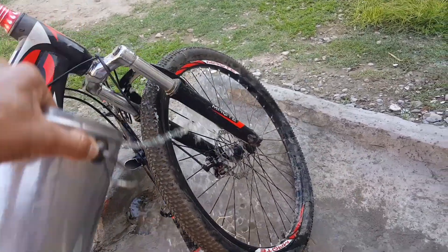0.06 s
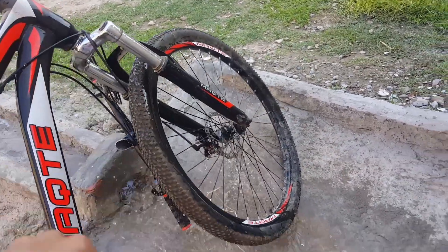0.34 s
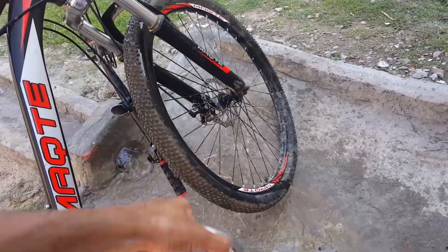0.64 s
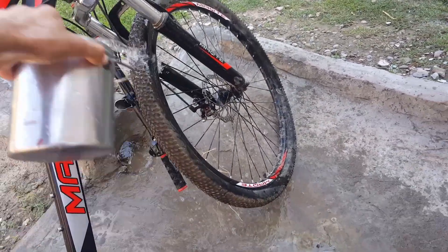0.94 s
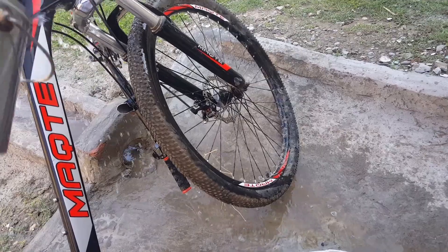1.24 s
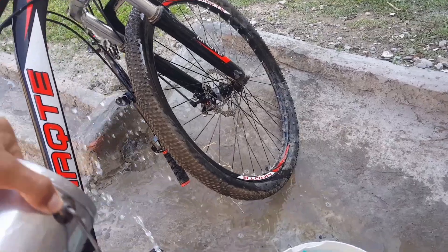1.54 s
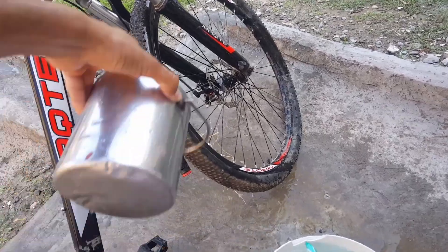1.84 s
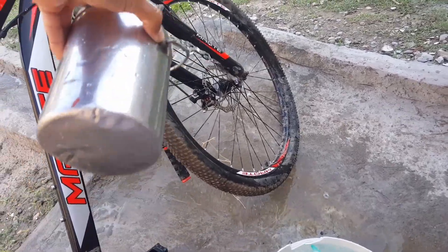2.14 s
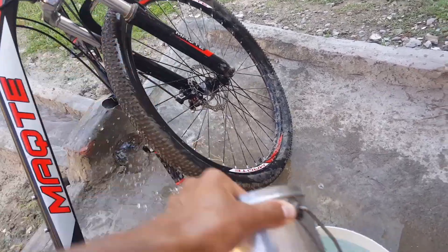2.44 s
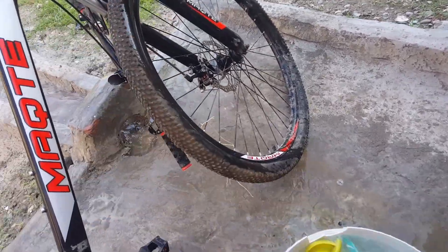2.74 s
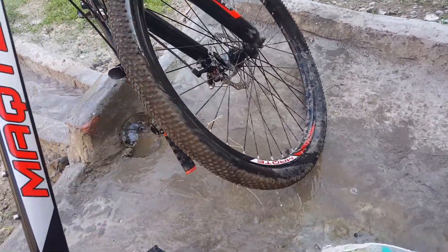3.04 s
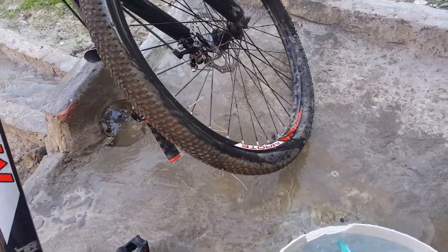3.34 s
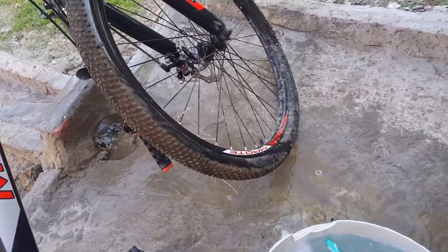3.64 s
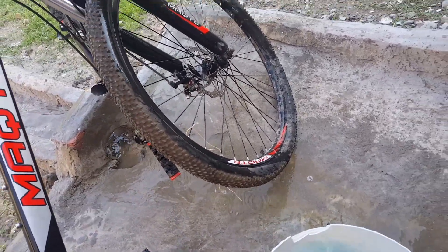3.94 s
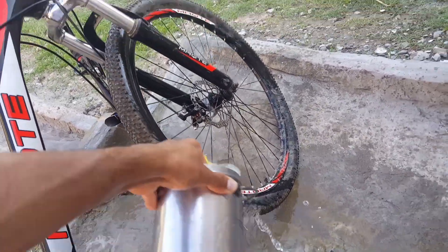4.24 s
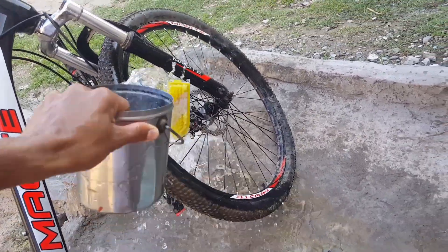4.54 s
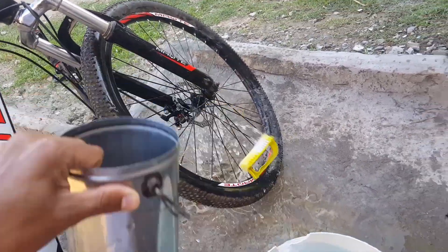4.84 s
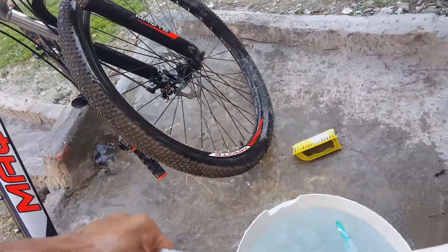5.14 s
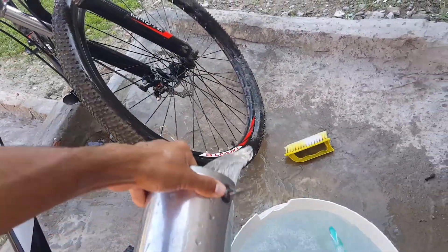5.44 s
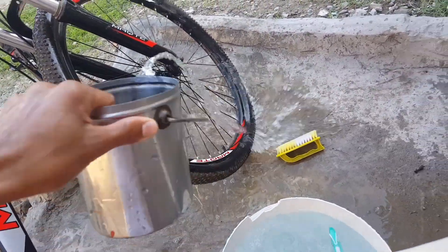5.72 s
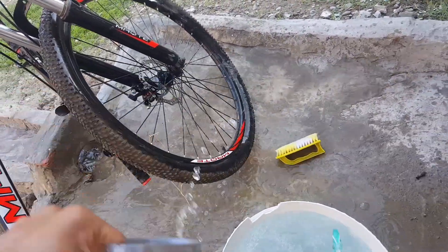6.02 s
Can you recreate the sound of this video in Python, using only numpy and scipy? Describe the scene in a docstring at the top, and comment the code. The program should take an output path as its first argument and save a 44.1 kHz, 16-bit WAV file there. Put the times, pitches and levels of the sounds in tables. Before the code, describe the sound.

Water splashes over a bicycle and drips onto wet concrete, while a steel can clanks and gurgles full in a plastic bucket.

```python
"""Water splashes over a bicycle in a yard, spatters on the frame and drips into puddles on the concrete.
It is soapy water, scooped from a plastic bucket with a steel can and thrown. The can clanks, knocks
the bucket and gurgles full, and a scrubbing brush tumbles out with the water. A motor hums far away.
The water sounds through ringing air bubbles and the ticks of bursting drops; can, bucket and brush
ring with their own fading tones when they are struck."""
import sys
import numpy as np
from scipy import signal
from scipy.fft import rfft, irfft, next_fast_len
from scipy.io import wavfile
from scipy.ndimage import map_coordinates

SR = 44100
rng = np.random.default_rng(int(sys.argv[2]) if len(sys.argv) > 2 else 0)


def persist_wave(psi):
    """Save psi, clipped to +-1, as 16-bit WAV."""
    counts = np.round(np.clip(psi, -1, 1) * 32767).astype(np.int16)
    wavfile.write(sys.argv[1], SR, np.atleast_2d(counts).T)


N = 276948


def amp(db):
    """Turn decibels into a gain."""
    return 10 ** (np.asarray(db) / 20)


def unit(x):
    """Scale a sound to an average (rms) level of 1."""
    return x / np.sqrt(np.mean(x ** 2) + 1e-20)


def along(points, hz):
    """Read between (pitch, value) points, with every octave equally wide."""
    pitches, values = np.transpose(points)
    return np.interp(np.log(hz + 1), np.log(pitches), values)


def wobble(rate, size=N):
    """A smooth curve through rate random values a second."""
    points = rng.standard_normal(int(size * rate / SR) + 4)
    return map_coordinates(points, [np.arange(size) * rate / SR])


def noise(colour, size, width):
    """Stereo noise: colour sets the level at each pitch, width how much left and right differ."""
    m = next_fast_len(size)
    gain = amp(along(colour, np.fft.rfftfreq(m, 1 / SR)))
    pair = irfft(rfft(rng.standard_normal((2, m))) * gain, m)[:, :size]
    mid = pair.mean(axis=0)
    return unit(mid + width * (pair - mid))


def add(track, s, sound):
    """Mix a short sound into the track at s seconds."""
    start = max(round(s * SR), 0)
    part = track[:, start:start + sound.shape[-1]]
    part += sound[..., :part.shape[-1]]


# two shared noise colours, bright spray and a dull thud: (pitch [Hz], level [dB])
SPRAY_COLOUR = [(60, -50), (300, -72), (1500, 0), (3000, 6), (5500, 5), (7500, -3.5), (9700, -13.5),
                (12500, -2.5), (16000, -10.5)]
THUD_COLOUR = [(35, -41), (200, 5.5), (700, 1), (1900, -5.5), (3200, -18), (6000, -14.5), (9500, -37),
               (16000, -41)]
def burst(colour, fade_s):
    """A puff of noise. Here and below, a fade time is how long a sound takes to drop 60 dB."""
    t = np.arange(SR // 2) / SR
    return noise(colour, len(t), width=0.84) * amp(-60 * t / fade_s) * (1 - np.exp(-t / 0.00029))


def ring(tones, attack_s, spread, glide=0, settle_s=0.0362, waver=0):
    """A struck object's fading tones: glide bends them, waver smears them, spread widens the stereo."""
    t = np.arange(SR // 2) / SR
    hz, db, fade_s = np.transpose(tones)[:, :, None]
    bent_time = t + glide * (t - settle_s * (1 - np.exp(-t / settle_s)))
    slosh = waver * np.array([wobble(86.6, size=len(t)) for _ in hz])
    phase = spread * rng.standard_normal((2, len(hz), 1))
    level = amp(db + rng.standard_normal(hz.shape) - 60 * t / fade_s)
    waves = level * np.sin(2 * np.pi * (hz * bent_time + slosh) + phase)
    return waves.sum(axis=1) * (1 - np.exp(-t / attack_s))


def bubbles(times, hz, gain, cycles, rise, size, life_scatter=0.89):
    """Each bubble rings for about cycles swings, mostly rising in pitch, and ends after size samples."""
    t = np.arange(size) / SR
    life, climb, delay, pan = rng.standard_normal((len(times), 4)).T[:, :, None]
    hz = hz[:, None]
    age = t * hz / cycles * np.exp(life_scatter * life)  # 1 when it has faded by 60 dB
    phase = hz * t * (1 + rise * np.minimum(age, 1) * (1 + 0.99 * climb) / 2)
    envelope = amp(-60 * age) * (1 - np.exp(-2 * abs(phase))) * (1 - t * SR / size)
    wave = gain[:, None] * envelope * np.sin(2 * np.pi * phase)
    ears = []
    for side in (1, -1):
        start = np.maximum(times[:, None] * SR + side * 3 * delay, 0).astype(int)
        heard = wave * amp(side * 2 * pan * np.minimum(hz / 1500, 1))  # low notes stay near the middle
        ears.append(np.bincount((start + np.arange(size)).ravel(), heard.ravel(), N)[:N])
    return np.array(ears)


def swarm(per_s, centre_hz, octaves, cycles, scatter_db, rise, size, per_drip=1):
    """A stream of random bubbles; those of one drip come close together and are equally strong."""
    drips = np.repeat(rng.random((int(per_s * N / SR / per_drip), 2)), per_drip, axis=0)
    chance = rng.random((len(drips), 3))
    times = drips[:, 0] * N / SR - 0.008 * np.log(1 - chance[:, 0])  # about 8 ms after the drip
    hz = centre_hz * 2 ** (octaves * (chance[:, 1] + chance[:, 2] - 1))
    return unit(bubbles(times, hz, amp(-scatter_db * drips[:, 1]), cycles, rise, size))


# the motor's tones: (pitch [Hz], level [dB], waver [cycles])
MOTOR_TONES = [(39, -55, 0.032), (68.8, -60.5, 0.44), (77.3, -71, 0.33), (116, -65.5, 0.18)]
# the soft rush of open air: (pitch [Hz], level [dB])
AIR_COLOUR = [(20, -18), (50, -12), (70, 3), (130, -2.5), (300, -8.5), (1000, -5.5), (3000, -30.5),
              (9000, -30), (16000, -38)]
def motor_and_air():
    """A far motor drones, slightly unsteady, under the open air."""
    t = np.arange(N) / SR
    hum = np.zeros(N)
    for hz, db, waver in MOTOR_TONES:
        gain = amp(db + 0.37 * wobble(4.1))
        hum += gain * unit(np.sin(2 * np.pi * (hz * t + waver * wobble(11))))
    return hum + amp(-54.5) * noise(AIR_COLOUR, N, width=0.87)


# how long the yard echoes: (pitch [Hz], fade time [s])
ECHO_FADES = [(150, 0.56), (1500, 0.39), (5000, 0.19), (14000, 0.29)]
def yard_echo(sound):
    """Concrete and house walls throw back a short, blurred echo."""
    hz, t, spectrum = signal.stft(rng.standard_normal((2, SR // 2)), SR, nperseg=256)
    tail = signal.istft(spectrum * amp(-60 * t / along(ECHO_FADES, hz)[:, None]), SR, nperseg=256)[1]
    tail = np.pad(tail / np.linalg.norm(tail[0]), ((0, 0), (220, 0)))  # arrives 5 ms late
    return signal.fftconvolve(sound, tail, axes=1)[:, :N]


# the brush hits the bicycle's fork, then the concrete: (time [s], level [dB], brightness [dB/octave])
BRUSH_BOUNCES = [(4.62, -27, 7), (4.624, -20.5, -0.5), (4.844, -28, 3.5), (4.852, -27.5, 3),
                 (5.059, -20.5, -3.5), (5.062, -30, -7)]
# its plastic body: (pitch [Hz], level [dB], fade time [s])
BRUSH_TONES = [(212, -3.5, 0.017), (496, -4, 0.024), (846, 17, 0.0078), (1390, 2.5, 0.018),
               (1830, -1, 0.033), (2440, 11, 0.013), (3420, -17, 0.033)]
def brush():
    """The light brush clacks with almost no ring."""
    out = np.zeros((2, N))
    hz, db, fade_s = np.transpose(BRUSH_TONES)
    for s, level, brightness in BRUSH_BOUNCES:
        tones = np.transpose([hz, db + brightness * np.log2(hz / 1400), fade_s])
        clack = ring(tones, attack_s=0.0018, spread=1)
        tick = amp(brightness - 5) * burst(SPRAY_COLOUR, fade_s=0.038)
        add(out, s, amp(level) * (clack + tick))
    return out


# the can knocks the bucket: (time [s], level [dB])
BUCKET_KNOCKS = [(2.8177, -12.5), (2.836, -27.5), (2.857, -36), (2.914, -32.5)]
# the full plastic bucket: (pitch [Hz], level [dB], fade time [s])
BUCKET_TONES = [(172, -13.5, 0.09), (242, -4, 0.09), (290, -5, 0.062), (461, 1, 0.073), (1240, -0.5, 0.02),
                (1540, -2, 0.048), (1670, 2, 0.04), (1767, 5.5, 0.062), (2250, -12, .07), (2385, 1, 0.062)]
# the can's rim scuffs along it: (pitch [Hz], level [dB])
SCUFF_COLOUR = [(60, -12), (200, 8), (450, -1), (640, -6), (1200, -12), (1760, 11.5), (2050, 0), (2430, -3),
                (3100, -4), (16000, -66)]
def bucket():
    """Steel against thick plastic: a hollow clunk, roughened as the rim scuffs along."""
    out = np.zeros((2, N))
    for s, db in BUCKET_KNOCKS:
        clunk = ring(BUCKET_TONES, attack_s=0.0016, spread=0.36)
        scuff = burst(THUD_COLOUR, fade_s=0.041) + burst(SCUFF_COLOUR, fade_s=0.12)
        add(out, s, amp(db) * (clunk + amp(-4) * scuff))
    return out


# the steel can clanks, knocked by the bucket, the brush or its wire handle:
# (time [s], base level [dB], base damping [factor], wall level [dB], favoured wall pitch [Hz],
# wall tuning [factor], wall glide [fraction], base start/end pitch [ratio])
CAN_CLANKS = [(2.529, -9, 1.04, -27.5, 4400, 0.97, 0.004, 0.95),
              (2.819, -31.5, 0.35, -34.5, 1750, 1, 0.014, 0.95),
              (4.5433, -17, 2.7, -28.5, 2100, 0.9, 0.063, 1.083),
              (4.899, -37, 0.23, -36, 2400, 0.84, 0.037, 1.08),
              (5.726, -14, 0.86, -19.5, 2000, .965, 0.12, 1.032),
              (6.1546, -15.5, 0.54, -21, 2950, 1, 0.111, 1)]
# the can's flat base and thin wall: (pitch [Hz], level [dB], fade time [s])
BASE_TONES = [(505, 3.5, 0.12), (504, 3, 0.047), (604, -24, 0.13)]
WALL_TONES = [(775, -8, 0.25), (975, -9, 0.22), (1160, -8, 0.23), (1290, -5, 0.27), (1380, -4, 0.29),
              (1770, -3.5, 0.16), (2200, -13, 0.18), (2350, -3, 0.14), (2490, -3, 0.12), (2590, -9, 0.12),
              (2840, -19, .15), (3030, -8, 0.14), (3570, -1, 0.095), (3800, -1, 0.1), (4050, -9, 0.12),
              (4610, -5, .09), (4960, -4, 0.12), (5550, 0, 0.08)]
# the noise of the strike: (pitch [Hz], level [dB])
CLATTER_COLOUR = [(40, -39), (150, -9), (400, 3), (1300, 5), (2600, 2.5), (4000, -2.5), (6000, -5.5),
                  (9500, -22), (13000, -13.5), (16000, -25)]
def can():
    """The base booms, damped by hand and water; the wall's tones slide as water runs off it."""
    out = np.zeros((2, N))
    hz, db, fade_s = np.transpose(WALL_TONES)
    for s, base_db, damping, wall_db, favoured_hz, tuning, glide, bend in CAN_CLANKS:
        base = np.divide(BASE_TONES, [1 / bend, 1, damping])
        boom = ring(base, attack_s=0.0041, spread=0.088, glide=1 / bend - 1, settle_s=0.011)
        wall = np.transpose([hz * tuning, db - 3 * np.log2(hz / favoured_hz) ** 2, fade_s])
        slide = glide * np.minimum(1410 / hz[:, None], 1) ** 0.76  # water bends the low tones most
        clang = ring(wall, attack_s=0.0058, spread=1.11, glide=slide, settle_s=0.076, waver=1.6 * glide)
        clatter = burst(CLATTER_COLOUR, fade_s=0.079)
        add(out, s, amp(base_db - 3) * boom + amp(wall_db + 1) * clang + amp(wall_db + 5) * clatter)
    return out


# water rushes into the sunken can: (time [s], length [s], level [dB], first pitch [Hz], last pitch [Hz])
CAN_GULPS = [(3.209, 0.19, -31.5, 1620, 1480), (3.388, 0.046, -30, 378, 523),
             (3.437, 0.075, -25.5, 564, 985), (3.459, 0.16, -38.5, 282, 440),
             (3.626, 0.15, -30.5, 675, 1110), (3.798, 0.026, -25.5, 940, 1100),
             (3.886, 0.034, -27.5, 616, 880), (3.998, 0.049, -32, 990, 1150)]
# the froth as it fills: (time [s], level [dB])
FROTH_LEVELS = [(3.3, -42.5), (3.42, -43.5), (3.55, -44), (3.69, -36), (3.82, -45), (4.1, -47)]
def scoop():
    """The can fills in gulps: chains of bubbles slide in pitch as the air space changes, amid froth."""
    out = np.zeros((2, N))
    for s, length, db, first_hz, last_hz in CAN_GULPS:
        count = int(280 * length) + 1  # 280 bubbles a second
        chance = rng.standard_normal((count, 2))
        progress = (np.arange(count) + rng.random(count)) / count
        hz = first_hz * (last_hz / first_hz) ** progress * 2 ** (0.075 * chance[:, 0])
        gain = amp(db - 1 + 2.3 * chance[:, 1])
        out += bubbles(s + length * progress, hz, gain, cycles=20, rise=.08, size=3000, life_scatter=.27)
    froth_db = np.interp(np.arange(N) / SR, *np.transpose(FROTH_LEVELS), left=-120, right=-120)
    froth = swarm(per_s=3200, centre_hz=1753, octaves=1.38, cycles=23, scatter_db=21, rise=.08, size=500)
    return out + amp(froth_db) * froth


# big air pockets under the water: (time [s], level [dB], pitch [Hz])
AIR_POCKETS = [(.395, -33, 385), (1.008, -32.5, 328), (2.916, -23, 376), (3.067, -28.5, 356),
               (3.378, -21, 414), (3.408, -24, 460), (3.435, -16.5, 327), (3.44, -20.5, 136),
               (3.494, -29, 405), (3.57, -31, 192), (3.757, -36, 243), (3.802, -30, 395), (3.905, -30, 362),
               (4.585, -34, 142), (5.241, -32, 330), (5.396, -35.5, 249)]
def glugs():
    """Trapped air rises in large, low bubbles that break with a dull slap."""
    times, db, hz = np.transpose(AIR_POCKETS)
    out = bubbles(times, hz, amp(db + 1), cycles=13.6, rise=0.22, size=6000, life_scatter=0.041)
    for s, level in zip(times, db):
        add(out, s, amp(level - 9) * burst(THUD_COLOUR, fade_s=0.097))
    return out


# the hardest drops on frame, tyre and can: (time [s], level [dB])
HARD_DROPS = [(.0134, -27.5), (.1075, -35), (.1516, -30), (.17, -31), (.191, -29), (.2092, -32),
              (.226, -30), (.2445, -36), (.2628, -41), (.2913, -34.5), (.3087, -35.5), (.857, -39),
              (1.0062, -26.5), (1.3214, -40), (1.6277, -29), (1.6591, -25.5), (1.7181, -33.5),
              (1.7334, -29), (1.824, -42), (2.174, -44.5), (2.3617, -35), (2.3752, -33), (2.3871, -34),
              (2.4056, -31.5), (2.9555, -40.5), (3.434, -28.5), (3.683, -37), (3.709, -31), (3.9754, -30),
              (4.3804, -29), (4.454, -29.5), (4.729, -33), (4.883, -33), (5.236, -35), (6.0345, -35)]
def drops():
    """Drops burst with a tick and a puff of spray; light, random ones also trap a tiny ringing bubble."""
    chance = rng.random((int(11 * N / SR), 3))  # 11 light drops a second
    times = chance[:, 0] * N / SR
    levels = -50 + 9 * (2 * chance[:, 1] - 1)
    bubble_hz = 4770 * 2 ** (chance[:, 2] - .5)
    out = bubbles(times, bubble_hz, amp(levels + 6), cycles=44, rise=.1, size=800)
    for s, db in [*HARD_DROPS, *zip(times, levels)]:
        tick = burst(SPRAY_COLOUR, fade_s=0.009)
        puff = burst(SPRAY_COLOUR, fade_s=0.031)
        add(out, s, amp(db + 1) * tick + amp(db - 0.5) * puff)
    return out


# the loudest plops in puddle and bucket: (time [s], level [dB], pitch [Hz])
LOUD_PLOPS = [(.002, -25, 2860), (.043, -25.5, 2620), (.09, -36, 1650), (0.093, -33, 2830),
              (.151, -24, 2230), (.192, -26, 3510), (0.2325, -26.5, 2980), (.285, -33, 1130),
              (0.378, -30.5, 5450), (.395, -32, 1090), (.427, -34.5, 5170), (0.53, -26, 2270),
              (.688, -26.5, 944), (0.739, -28, 2380), (0.979, -26.5, 1840), (1.094, -31, 1130),
              (1.465, -25.5, 2430), (1.627, -22, 2490), (1.649, -19.5, 1693), (1.716, -21.5, 3370),
              (1.762, -27, 2340), (1.824, -34.5, 5200), (1.907, -31, 2040), (1.957, -34, 2350),
              (2.021, -38.5, 5600), (2.069, -33, 2350), (2.088, -30, 1110), (2.102, -34, 2380),
              (2.1735, -29, 1160), (2.201, -28.5, 1027), (2.236, -29, 976), (2.48, -25, 895),
              (2.603, -27, 2230), (2.63, -29.5, 863), (2.888, -24, 2310), (3.259, -19, 1580),
              (3.392, -19, 1360), (3.434, -20.5, 1820), (3.492, -22, 2280), (3.576, -20, 724),
              (3.682, -23.5, 890), (3.7082, -21, 930), (3.752, -22, 1043), (3.802, -23.5, 727),
              (3.829, -23, 1600), (3.882, -23, 645), (3.972, -25, 756), (4.161, -22.5, 2020),
              (4.518, -22, 1620), (5.169, -26, 1800), (5.37, -28, 2110), (5.457, -27.5, 2240),
              (5.518, -30.5, 980), (5.571, -31.5, 2220), (5.878, -23, 1800), (5.986, -35, 980),
              (6.043, -29.5, 940), (6.113, -37, 2200), (6.248, -35, 2260), (6.251, -31, 960)]
# a plop's wet slap: (pitch [multiple of the plop's pitch], level [dB])
SLAP_COLOUR = [(.2, -18), (.7, 8), (1.6, -2), (3, -29), (8, -36.5)]
def plops():
    """A falling blob slaps the surface, traps one main bubble and sheds smaller ones just after."""
    times, db, hz = np.transpose(LOUD_PLOPS)
    out = bubbles(times, hz, amp(db - 1), cycles=52, rise=0.2, size=3000, life_scatter=0.14)
    shed_count = 6
    chance = rng.random((len(times) * shed_count, 2))
    shed_times = np.repeat(times, shed_count) + 0.02 * chance[:, 0]
    shed_hz = 1700 * 2 ** (2.12 * (chance[:, 1] - .5))
    shed_gain = np.repeat(amp(db - 11), shed_count)
    out += bubbles(shed_times, shed_hz, shed_gain, cycles=6.8, rise=0.051, size=1200)
    for s, level, pitch in LOUD_PLOPS:
        add(out, s, amp(level - 10) * burst(np.multiply(SLAP_COLOUR, [pitch, 1]), fade_s=0.029))
        add(out, s, amp(level - 26) * burst(SPRAY_COLOUR, fade_s=0.037))
    return out


def spray(level_db):
    """Bursting droplets: a strong throw merges them into a hiss, a weak one leaves single ticks."""
    density = np.minimum(amp(level_db + 46), 1)
    lands = rng.random(N) < 600 * density / SR  # up to 600 droplets a second
    droplets = lands * amp(-26 * rng.random(N)) / np.sqrt(density)
    crackle = unit(signal.lfilter([1], [1, -np.exp(-1 / (0.0032 * SR))], droplets))
    envelope = crackle + 0.88 * np.sqrt(density)
    return amp(level_db + 6.5) * unit(envelope * noise(SPRAY_COLOUR, N, width=1))


def flow(splashes, runoff_db, dripping_db, runoff_s=0.36, fall_db_per_s=175):
    """Loudness in dB: each splash swells, holds and dies, then drains off into a steady dripping."""
    t = np.arange(N) / SR
    power = np.zeros(N)
    attack_s = 0.017
    for s, length, db in splashes:
        swell_s = attack_s + 0.29 * length  # longer splashes swell more slowly
        swell = np.clip(.5 + (t - s - attack_s / 2) / swell_s, 0, 1)
        power += (swell * amp(db - fall_db_per_s * np.maximum(t - s - length, 0))) ** 2
    keep = np.exp(-1 / (runoff_s * SR))
    runoff = signal.lfilter([1 - keep], [1, -keep], power)
    return 10 * np.log10(power + amp(runoff_db) ** 2 * runoff + amp(dripping_db) ** 2)


# water lands on bicycle, ground or bucket: (time [s], length [s], spray level [dB], bubble level [dB])
WATER_LANDINGS = [(-0.03, 0.34, -51.5, -69), (0.491, 0.056, -61.5, -45.5), (0.673, 0.036, -59, -45),
                  (0.955, 0.019, -63, -45), (1.074, 0.06, -60, -48.5), (1.258, 0.035, -57, -42),
                  (1.586, 0.13, -54.5, -49), (2.024, 0.046, -72, -45.5), (2.338, 0.2, -54.5, -99),
                  (2.46, 0.2, -57, -47), (2.674, 0.16, -68, -52), (2.864, 0.072, -55.5, -40.5),
                  (2.975, 0.18, -58.5, -50), (3.152, 0.14, -50.5, -49.5), (3.309, 0.19, -52.5, -40),
                  (3.622, 0.21, -51, -36.5), (3.84, 0.18, -55.5, -43), (4.022, 0.069, -54.5, -40.5),
                  (4.17, 0.039, -49, -41.5), (4.305, 0.063, -52, -44.5), (4.422, 0.24, -47.5, -40),
                  (4.628, 0.39, -49, -47), (5.115, 0.14, -59, -45), (5.33, 0.061, -62, -50.5),
                  (5.654, 0.052, -47, -42), (5.702, 0.21, -47.5, -43.5), (5.952, 0.046, -52, -80),
                  (6.17, 0.045, -55, -41)]
def water():
    """Thrown water lands in uneven gushes: deep gurgles, puddle bubbles, pattering drops and spray."""
    times, lengths, spray_levels, bubble_levels = np.transpose(WATER_LANDINGS)
    spray_db = flow(zip(times, lengths, spray_levels), runoff_db=-18.5, dripping_db=-60.5)
    bubble_db = flow(zip(times, lengths, bubble_levels), runoff_db=-4.5, dripping_db=-51)
    gush_db = 2.2 * np.tanh(wobble(22))
    deep = swarm(per_s=300, centre_hz=504.5, octaves=1.67, cycles=20.6,
                 scatter_db=34.5, rise=0.17, size=2400)
    gurgle = amp(bubble_db - 8.5 + gush_db) * deep
    # a trickle rings as separate bubbles; a hard throw slaps the surface in countless short pops
    hardness = np.clip((spray_db + 60) / 22, 0, .85)
    trickle = swarm(per_s=850, centre_hz=1720, octaves=1.466, cycles=23.7,
                    scatter_db=31, rise=0.21, size=1200, per_drip=7)
    slaps = swarm(per_s=2400, centre_hz=1553, octaves=1.627, cycles=18,
                  scatter_db=38, rise=0.061, size=500, per_drip=4)
    puddle = amp(bubble_db + gush_db) * (np.sqrt(1 - hardness) * trickle + np.sqrt(hardness) * slaps)
    # small drops follow both the puddles and the spray
    beads = swarm(per_s=600, centre_hz=2300, octaves=.8, cycles=26, scatter_db=26, rise=.08, size=600)
    patter = amp((bubble_db + spray_db) / 2 + gush_db - 1) * beads
    return gurgle + puddle + patter + spray(spray_db + gush_db / 2)


def scene():
    """Water and knocks echo in the yard, over the far motor and the open air."""
    wet = water() + scoop() + plops() + glugs() + drops()
    hits = can() + bucket() + brush()
    return wet + hits + yard_echo(amp(-17.5) * wet + amp(-13.5) * hits) + motor_and_air()


# the two microphones differ in tone: (pitch [Hz], left minus right [dB])
MIC_BALANCE = [(120, 0.3), (280, -2), (550, 6), (1000, -1.5), (2000, 4), (4000, 0.9), (8000, 1.5),
               (13000, -3)]
# being close together, they share their bass: (pitch [Hz], stereo width [dB])
MIC_WIDTH = [(100, -15), (400, -7.5), (1200, 0)]
def record(dry):
    """A phone's two microphones colour the sound and lose the deepest rumble and the highest treble."""
    m = next_fast_len(N + SR // 4)
    hz = np.fft.rfftfreq(m, 1 / SR)
    low_cut = signal.butter(4, 31, "highpass", fs=SR, output="sos")
    pair = rfft(signal.sosfilt(low_cut, dry), m)
    mid = pair.mean(axis=0)
    narrowed = mid + amp(along(MIC_WIDTH, hz)) * (pair - mid)
    balance = amp(np.outer([.5, -.5], along(MIC_BALANCE, hz)))
    return irfft(narrowed * balance * (hz < 16200), m)[:, :N]


dry = scene()
out = record(dry)
persist_wave(out)
```